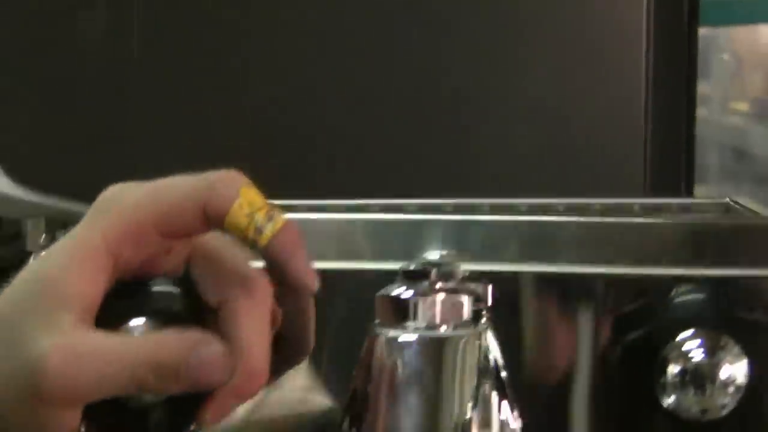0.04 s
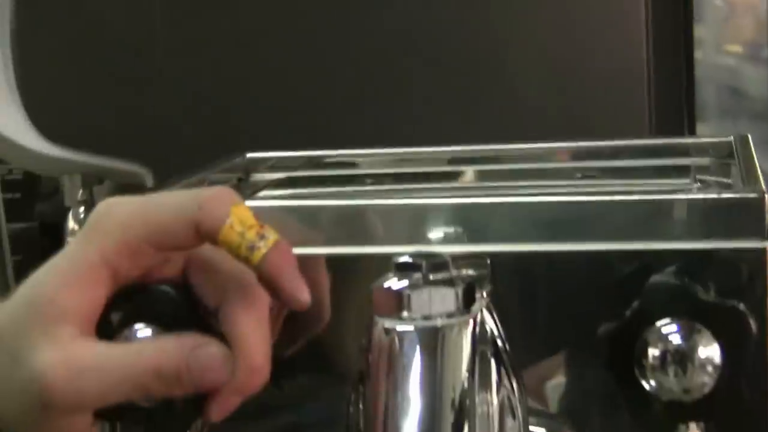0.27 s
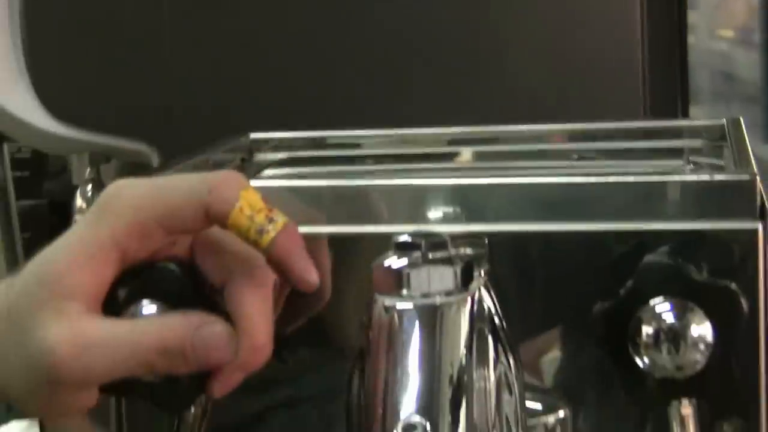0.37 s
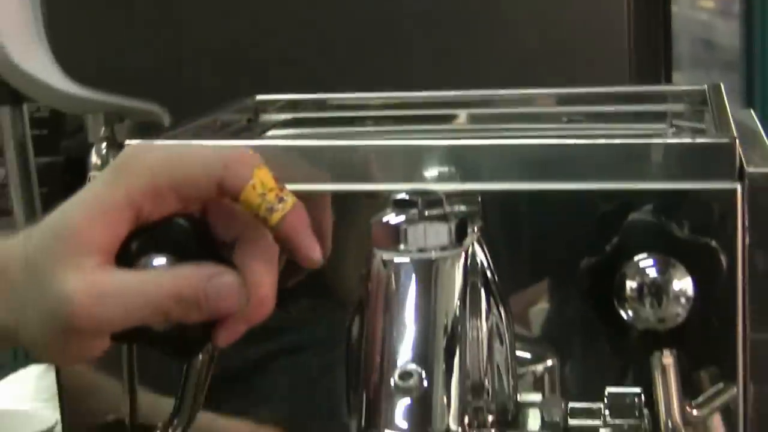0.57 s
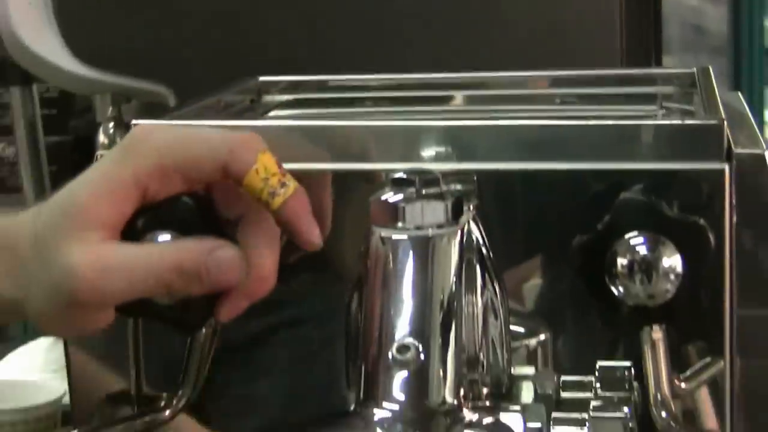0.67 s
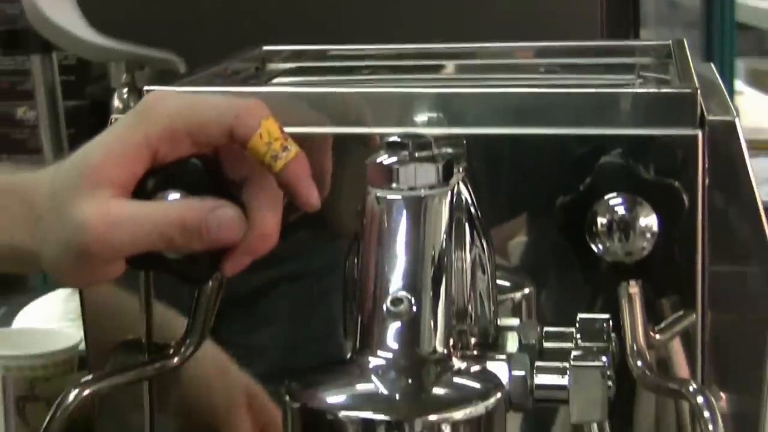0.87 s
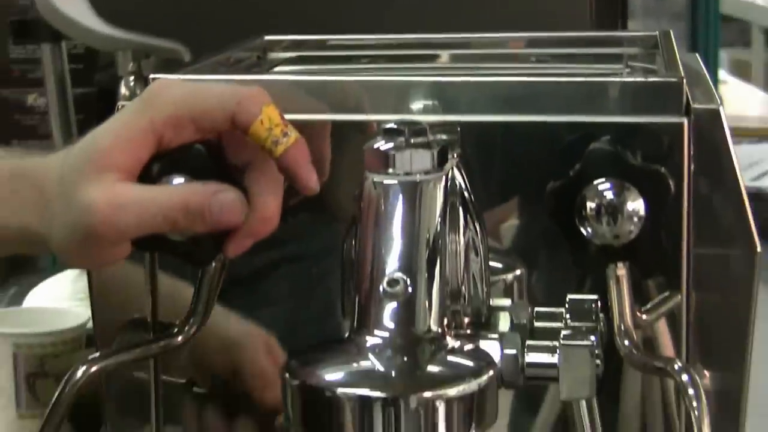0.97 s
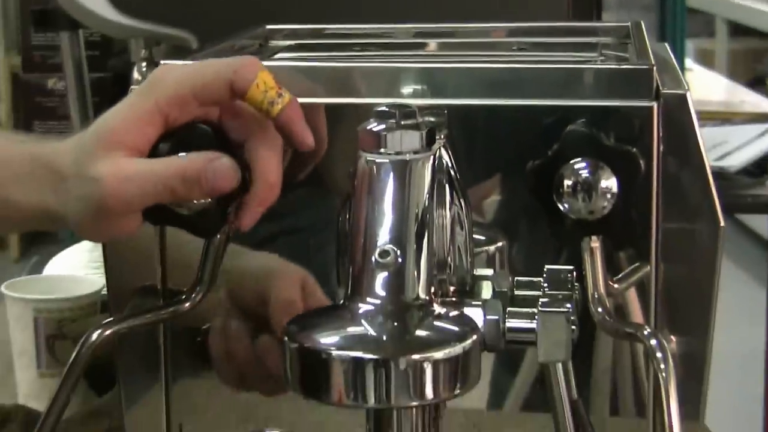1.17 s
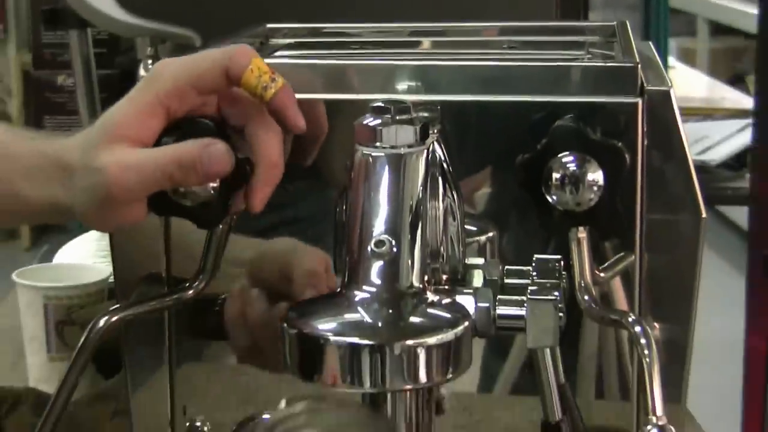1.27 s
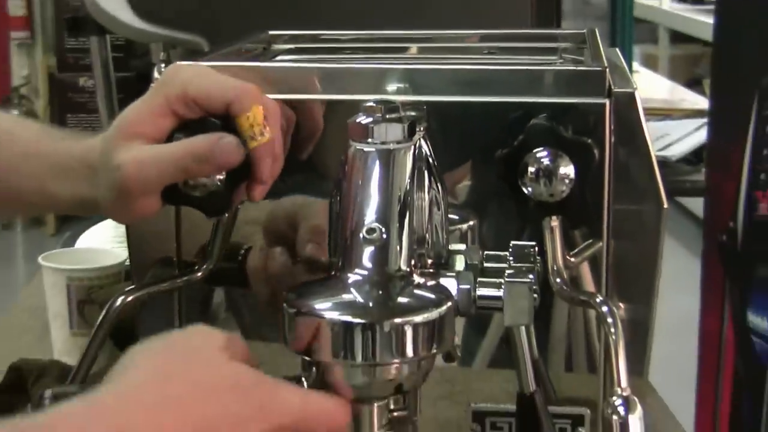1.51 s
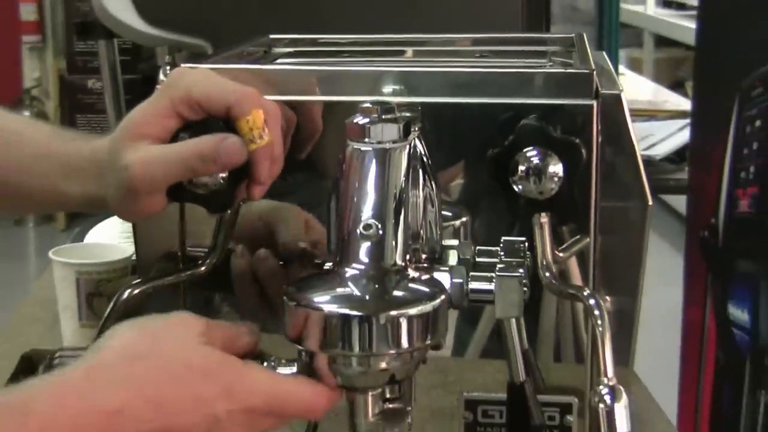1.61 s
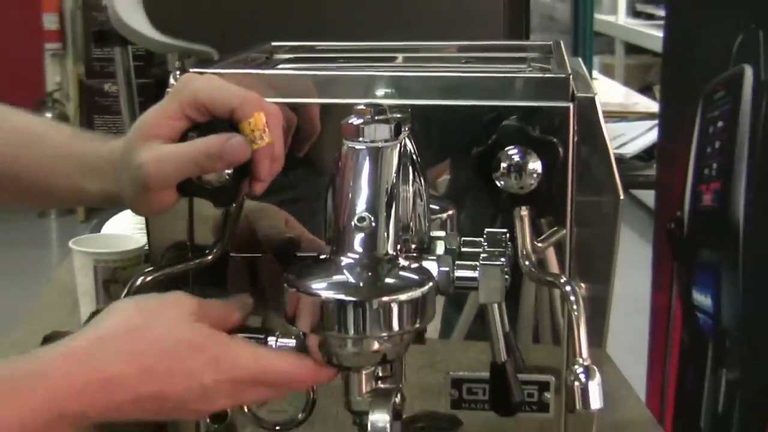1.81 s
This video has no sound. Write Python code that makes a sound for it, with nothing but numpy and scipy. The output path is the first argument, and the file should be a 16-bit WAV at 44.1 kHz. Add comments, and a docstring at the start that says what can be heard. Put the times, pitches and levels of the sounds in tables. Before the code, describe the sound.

Metallic knocks of a portafilter against a coffee machine's group head follow a heavy bench slam and light pickup clinks; steady machinery drones behind, with hall echo, and the nearby stereo microphone distorts on the loudest blow.

```python
"""Something heavy is slammed down on a workshop bench and a metal part rings: blows clatter as noise and ring modes.
A portafilter is picked up with small clinks and thumps, then knocks on the group head of an espresso machine.
Noise and drones of machinery fill the hall; a faint high whine, made of sines, glides about.
Filtered noise makes the hall's echo, and the loudest blows overload the microphone."""
import sys
import numpy as np
from scipy import signal
from scipy.io import wavfile

SR = 44100
rng = np.random.default_rng(int(sys.argv[2]) if len(sys.argv) > 2 else 0)


def nominal_scale(level):
    """Amplitude ratio for a level in decibels (scalar or array-like)."""
    x = np.asarray(level, float) / 20
    return 10 ** x


def transcribe(u):
    """Save the signal u as a 16-bit wav file named by the first command-line argument.

    u: samples, shape (n,) or (channels, n), limited to [-1, 1]; the rate is SR.
    q: integer samples, one column per channel.
    """
    v = np.clip(np.atleast_2d(u).T, -1, 1)
    q = np.round(v * 32767).astype(np.int16)
    wavfile.write(sys.argv[1], SR, q)


N = 81585


def rms_one(x):
    """Scale to rms 1."""
    return x / np.sqrt(np.mean(x ** 2) + 1e-20)


def at_hz(points, hz):
    """Read a table of (Hz, value) on a log-frequency axis."""
    table_hz, values = np.array(points).T
    return np.interp(np.log(hz), np.log(table_hz), values)


def ring(x, hz, t60):
    """Damped resonator: a unit click sets a sine of height 1 ringing, for a t60 of at least 5 ms."""
    radius = nominal_scale(-60 / (max(t60, .005) * SR))
    angle = 2 * np.pi * hz / SR
    return signal.lfilter([0, np.sin(angle)], [1, -2 * radius * np.cos(angle), radius ** 2], x + 1e-18)


def click(s, db):
    """One sample of the given height at the given second."""
    x = np.zeros(N)
    x[int(s * SR)] = nominal_scale(db)
    return x


def drift(rate):
    """Random course of straight lines between normal values of spread 1, rate values a second."""
    knots = rng.standard_normal(64)
    return np.interp(np.arange(N) / SR * rate, np.arange(64), knots)


def bands(gain_of_band, likeness):
    """Stereo noise in half-octave bands, each with its own gain and left-right likeness."""
    out = 0
    edges = 20 * 2 ** np.arange(0, 10.1, .5)
    white = rng.standard_normal((2, 2, N))
    for k, (low, high) in enumerate(zip(edges, np.minimum(edges[1:], .45 * SR))):
        band = signal.butter(2, [low, high], "band", fs=SR, output="sos")
        mid, side = signal.sosfilt(band, white[k % 2])  # neighbouring bands take different noise
        hz = np.sqrt(low * high)
        alike = np.clip(at_hz(likeness, hz), 0, 1)
        stereo = np.sqrt(1 + alike) * mid + np.sqrt(1 - alike) * side * [[1], [-1]]
        out = out + gain_of_band(hz) * stereo
    return out


def struck(blows, modes, tick_db):
    """Each blow clatters about its centre and pushes the modes near it for the contact time.

    Returns the direct sound and what goes out into the hall, where noise spreads as an even pulse of its band."""
    mode_scatter_db = 0.5
    crack_db, crack_length = -5.5, 1.08  # length in contact times
    rattle_db, rattle_s = -20, 0.011  # lingering part of the clatter
    tick_hz, tick_length = 6000, 1.14  # bright spray: lower edge, length in contact times
    splash_db, splash_s = -13, 0.015  # lingering part of the spray
    bright_db_per_octave = 3.5  # blows with a higher centre spray more
    soft_dulls = 0.46  # dB of spray lost per dB that a blow is softer than the hardest
    size = SR // 12
    t = np.arange(size) / SR
    out, sent = np.zeros(N + size), np.zeros(N + size)
    drive = np.zeros((len(modes), N + size))
    unit = (t == 0) * 1.
    hardest_db = np.max(blows, axis=0)[1]
    top = signal.butter(1, tick_hz, "high", fs=SR, output="sos")
    for s, db, hz, spread, ms in blows:
        i = int(s * SR)
        length = max(ms, .1) / 1000
        spread = max(spread, .2)
        push, white = np.exp(-t / length), rng.standard_normal(size)
        edges = [hz * 2 ** (-spread / 2), min(hz * 2 ** (spread / 2), .45 * SR)]
        band = signal.butter(2, edges, "band", fs=SR, output="sos")
        crack = (1 - np.exp(-4 * t / length)) * push ** (1 / crack_length)
        clatter = crack + nominal_scale(rattle_db) * np.exp(-t / rattle_s)
        spray = push ** (1 / tick_length) + nominal_scale(splash_db) * np.exp(-t / splash_s)
        softness_db = soft_dulls * (db - hardest_db)
        spray_db = tick_db + softness_db + bright_db_per_octave * np.log2(hz / 1150.0)
        parts = [(band, nominal_scale(db + crack_db) * clatter), (top, nominal_scale(db + crack_db + spray_db) * spray)]
        for sos, envelope in parts:
            out[i:i + size] += rms_one(signal.sosfilt(sos, white)) * envelope
            sent[i:i + size] += rms_one(signal.sosfilt(sos, unit)) * np.sqrt(np.mean(envelope ** 2))
        for k, (mode_hz, mode_db, _) in enumerate(modes):
            # modes far from the blow's centre are pushed less
            near_db = -6 * (np.log2(mode_hz / hz) / spread) ** 2 + mode_scatter_db * rng.normal()
            pulse = push * np.cos(2 * np.pi * (mode_hz * t + rng.random()))
            drive[k, i:i + size] += 2 * pulse / push.sum() * nominal_scale(db - 12 + mode_db + near_db)
    ringing = sum(ring(d[:N], hz, t60) for d, (hz, _, t60) in zip(drive, modes))
    return np.array([out[:N], sent[:N]]) + ringing


def hall_noise():
    """Machinery in the hall: broad noise whose bands flicker slightly, with drones of resonated noise."""
    # spectrum of the noise: pitch_hz, relative density_db
    spectrum = [(15, -39), (25, -46), (113, -2), (446, -10), (806, -14.5), (947, -15), (1110, -14),
                (2180, -27), (15600, -49.5)]
    # left-right likeness of the noise: pitch_hz, likeness (0 to 1)
    likeness = [(60, 0.82), (180, 0.96), (550, 0.79), (1650, 0.68), (4970, 0.027), (15000, 0.01)]
    # machine drones: pitch_hz, width_hz, rms level_db
    drones = [(120.6, 29, -39), (374, 43, -50), (522, 15.6, -45), (788, 88, -43)]
    noise_db, flicker_db, flicker_rate_hz = -37.5, 1.0, 11.9

    def gain(hz):
        return nominal_scale(at_hz(spectrum, hz) + flicker_db * drift(flicker_rate_hz))

    out = nominal_scale(noise_db) * rms_one(bands(gain, likeness))
    for hz, width, db in drones:
        t60 = np.log(1000) / np.pi / width
        out = out + nominal_scale(db) * rms_one(ring(rng.standard_normal(N), hz, t60))
    return out


def slam():
    """The heavy thing hits the bench: a group of blows sets the bench and the goods on it ringing."""
    # blows: start_s, relative level_db, centre_hz of the struck modes, spread_octaves, contact_ms
    blows = [(.2195, -14, 600, 2, 4.2), (.2243, 11, 364, 2.02, 2.84), (.2290, 8, 267, 0.87, 1.84),
             (.2365, 6.5, 600, 2.03, 4.8), (.2402, 7, 2570, 2.02, 0.96), (.2445, -17, 1300, 1.2, 1.2),
             (.2725, 2, 700, 0.69, 1.1), (.2805, -8, 700, 1.8, 1.3), (.309, -26, 500, 0.62, 1.1),
             (.358, -9, 413, 1.4, 1.6), (.44, -11, 250, 0.98, 11.4)]
    # modes of the bench and its goods: pitch_hz, relative level_db, t60_s (at least 5 ms sounds)
    modes = [(49.7, -5.5, 0.38), (120, -26, 0.019), (162.6, 8, 0.032), (250, 2, 0.021), (300, -9.5, 0.055),
             (491, 0.5, 0.038), (575, -5.5, 0.055), (745, 0.5, 0.017), (1080, -15, 0.012),
             (1537, 7, 0.0075), (2903, -2, 0.012), (3700, -9, 0.0035)]
    return struck(blows, modes, tick_db=-35.5)


def echo(x):
    """Dense reflections: a quick part off bench and machine case, and the hall's tail, dying band by band."""
    # decay of the hall: pitch_hz, t60_s
    decay = [(40, 0.94), (100, 0.28), (250, 0.9), (700, 0.89), (2000, 0.97), (5000, 0.74), (15000, 0.66)]
    # strength of the echo: pitch_hz, relative level_db
    strength = [(40, 0.5), (100, -15), (250, -8.5), (700, -15), (2000, -7.5), (5000, -11), (15000, 2.5)]
    # left-right likeness of the echo: pitch_hz, likeness (0 to 1)
    likeness = [(60, 0.99), (180, 1.0), (550, 0.97), (1650, 0.93), (4970, 0.41), (15000, 0.07)]
    near_db, near_t60_s = 14, 0.055  # level relative to the hall's tail
    onset_s = 0.00057
    t = np.arange(N) / SR
    near = nominal_scale(near_db - 60 * t / near_t60_s)

    def gain(hz):
        far = nominal_scale(-60 * t / at_hz(decay, hz))
        return nominal_scale(at_hz(strength, hz)) * (far + near) / np.sqrt(SR / 14)

    response = bands(gain, likeness) * (1 - np.exp(-t / onset_s))
    return signal.fftconvolve(x[None], response, axes=1)[:, :N]


def metal_pings():
    """Thin metal parts ring on after the slam, the clinks and the knocks: each ping is a single decaying sine."""
    # pitch of each ping: pitch_hz
    pitches = [8967, 12455, 14190, 14660, 14930, 15110, 4430, 4600, 6250, 6250, 877, 742, 7750, 9900, 7750,
               8900]
    # start of each ping, in the same order: start_s, level_db, t60_s
    starts = [(.2405, -29.5, .55), (.2405, -27, .24), (.2405, -44, .22), (.2405, -43, .18),
              (.2405, -42, .65), (.2405, -44, .55), (.6545, -16, .025), (.6742, -28, .06), (.850, -38, .03),
              (.8685, -38, .02), (1.651, -18, .11), (1.651, -22, .11), (1.4460, -23, .1),
              (1.4790, -35, .09), (1.519, -33, .1), (1.539, -35, .08)]
    return sum(ring(click(s, db), hz, t60) for hz, (s, db, t60) in zip(pitches, starts))


def thumps():
    """Dull blows through bench and machine case, each ringing one low mode and a detuned neighbour."""
    # thumps: start_s, level_db of the main mode ahead of the low-pass, pitch_hz, t60_s
    blows = [(0.578, -19.5, 137, 0.047), (0.657, -16.5, 235.5, 0.11), (0.783, -19.5, 235.4, 0.12),
             (0.802, -24, 222, 0.12), (.921, -15.5, 243, 0.058), (0.9404, -21, 241.4, 0.14),
             (1.449, -11.5, 154.8, 0.23), (1.504, -17.5, 141.4, 0.25), (1.537, -10.5, 157.4, 0.13),
             (1.496, -15.5, 300, 0.12), (1.546, -18.5, 362.4, 0.44), (1.586, -21.5, 340, 0.12),
             (1.654, -22.5, 275.4, 0.28), (1.769, -27, 357, 0.23)]
    out = np.zeros(N)
    for s, db, hz, t60 in blows:
        blow = click(s, db)
        out += ring(blow, hz, t60) + 0.35 * ring(blow, hz * 1.3, 0.72 * t60)
    return signal.sosfilt(signal.butter(2, 900, fs=SR, output="sos"), out)


def portafilter_pickup():
    """Clinks as the portafilter is picked up: small short blows ring its metal modes."""
    # clinks: start_s, relative level_db, centre_hz of the struck modes, spread_octaves, contact_ms
    blows = [(.6522, -11, 1910, 0.85, 0.76), (.6545, -10.5, 4400, 2.1, 0.69), (.6705, -6, 2300, 0.28, 0.43),
             (.6742, -10, 3820, 0.83, 0.33), (.697, -31, 8000, 1.6, 2.7), (.8270, -10, 1600, 0.93, 2.5),
             (.8385, -17.5, 2320, 1.6, 0.98), (.835, -10, 700, 0.49, 7.6), (.8395, -36, 9900, 1.2, 1.5),
             (.843, -13, 2810, 0.51, 1.1), (.847, -14.5, 600, 0.97, 8.1), (.862, -18.5, 2560, 0.7, 1.3),
             (.8685, -17.5, 794, 1.2, 1.3), (.884, -30, 1380, 2.9, 3.6), (.894, -30, 2620, 0.5, 4),
             (.8995, -44.5, 10100, 1.2, 1.3), (.9035, -17.5, 2550, 0.4, 2.1), (.912, -22, 1800, 1.5, 0.45),
             (.9546, -31.5, 2030, 0.79, 0.94)]
    # modes of the portafilter: pitch_hz, relative level_db, t60_s (at least 5 ms sounds)
    modes = [(700, 13, 0.011), (884, 3, 0.013), (1286, 8.5, 0.016), (1396, -9, 0.059), (1800, 12, 0.0083),
             (2300, 8.5, 0.0048), (2680, -8.5, 0.025), (3200, -18.5, 0.012), (4060, -8, 0.05),
             (4970, -5, 0.025), (7840, -9, 0.018), (10200, -18, 0.015), (334, 14, 0.043)]
    return struck(blows, modes, tick_db=-36)


def whines():
    """Thin gliding tones: sines whose pitch and level move in straight lines between points."""
    # one list of points per tone: time_s, pitch_hz, rms level_db
    tones = [
        [(1.06, 10200, -143), (1.11, 11400, -61), (1.14, 12300, -116), (1.153, 12400, -139)],
        [(1.15, 8100, -80), (1.2, 8750, -72), (1.26, 8600, -72), (1.33, 8450, -75), (1.38, 8500, -82)],
        [(1.2, 13850, -81), (1.26, 14000, -76), (1.31, 13900, -91)],
        [(1.345, 12500, -82), (1.362, 12500, -65), (1.376, 12600, -79), (1.41, 13600, -78), (1.44, 13900, -89)],
    ]
    t, out = np.arange(N) / SR, 0
    for points in tones:
        s, hz, db = np.transpose(points)
        level = nominal_scale(np.interp(t, s, db, -200, -200))  # silent outside its points
        phase = 2 * np.pi * np.cumsum(np.interp(t, s, hz)) / SR
        out = out + level * np.sin(phase)
    return np.sqrt(2) * out


def group_head_knocks():
    """The portafilter knocks against the group head, whose modes ring under a bright spray of contacts."""
    # knocks: start_s, relative level_db, centre_hz of the struck modes, spread_octaves, contact_ms
    blows = [(1.4455, 5.5, 1750, 1.57, 0.72), (1.4745, 5, 1270, 0.63, 0.89),
             (1.4765, -3.5, 3200, 0.74, 0.76), (1.501, -6, 1670, 1.7, 2.1), (1.5178, 0, 3700, 0.6, 0.27),
             (1.529, -9, 3700, 1.6, 1.6), (1.5378, 2, 2140, 2.73, 0.23), (1.547, -3.5, 2570, 0.71, 0.59),
             (1.556, -13, 2270, 2.2, 1.3), (1.605, -34, 11000, 1.1, 3.4), (1.6505, -30, 12100, 0.65, 4.1),
             (1.650, -16, 2430, 1.35, 5.7), (1.686, -32.5, 4900, 3.7, 1.5), (1.747, -23, 1080, 1.1, 9.7)]
    # modes of the group head: pitch_hz, relative level_db, t60_s
    modes = [(703, -7, 0.1), (971, -19.5, 0.3), (1120, -4.5, 0.031), (1294, 2.5, 0.028), (1472, -1, 0.031),
             (2050, -2, 0.015), (2000, -12.5, 0.09), (2289, -9, 0.078), (2890, -15, 0.028),
             (3240, -1, 0.016), (3800, 1.5, 0.02), (4085, 3, 0.013), (4540, 0.5, 0.02), (5210, -2.5, 0.016),
             (600, -7.5, 0.053)]
    return struck(blows, modes, tick_db=-13.5)


def pan(x, left_over_right_db):
    """Place a sound in stereo by the level difference of its two channels."""
    return x * nominal_scale(np.array([[.5], [-.5]]) * left_over_right_db)


def scene():
    """All blows in their stereo places, with the hall's echo, its machinery and the whines."""
    slam_direct, slam_sent = slam()
    pings, dull = metal_pings(), thumps()
    pickup_direct, pickup_sent = portafilter_pickup()
    knocks_direct, knocks_sent = group_head_knocks()
    # the machine case shades the treble of the knocks from the hall
    shade = signal.butter(2, 6800, fs=SR, output="sos")
    shaded = signal.sosfilt(shade, knocks_sent + dull)
    direct = pan(slam_direct, 1.4) + pan(pickup_direct, 2.5) + pan(knocks_direct, 1.2) + dull + pings
    # levels sent into the hall, in dB
    sent = slam_sent * nominal_scale(2.5) + pings * nominal_scale(-14) + pickup_sent * nominal_scale(-5) + shaded * nominal_scale(-1)
    return direct + echo(sent) + hall_noise() + whines()


def band_limit(x):
    """A steep low-pass at the top of the band."""
    return signal.sosfilt(signal.butter(12, 15730, fs=SR, output="sos"), x)


def record(dry):
    """The microphone sheds deep bass and its input overloads at full scale."""
    mic_cut_hz, full_scale, hardness = 85, 1.0, 30
    low_cut = signal.butter(1, mic_cut_hz, "high", fs=SR, output="sos")
    heard = signal.sosfilt(low_cut, dry)
    overloaded = heard / (1 + np.abs(heard / full_scale) ** hardness) ** (1 / hardness)
    return band_limit(overloaded)


dry = scene()
out = record(dry)
transcribe(out)
```